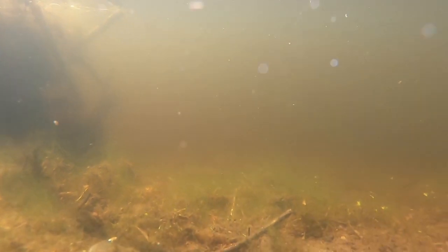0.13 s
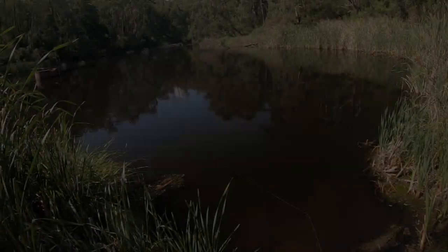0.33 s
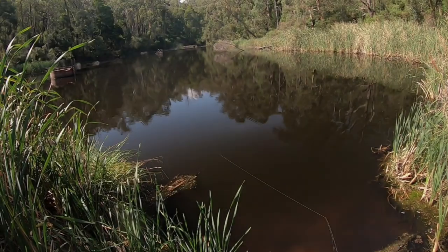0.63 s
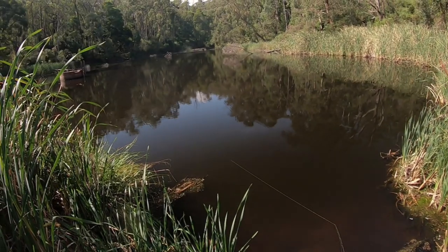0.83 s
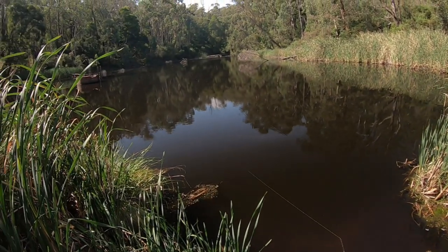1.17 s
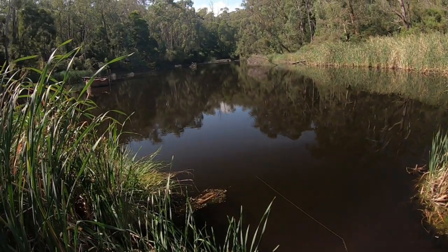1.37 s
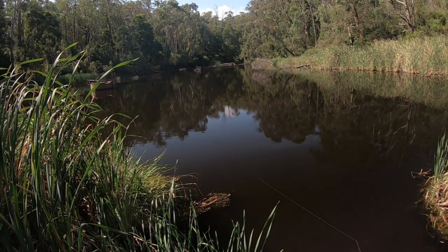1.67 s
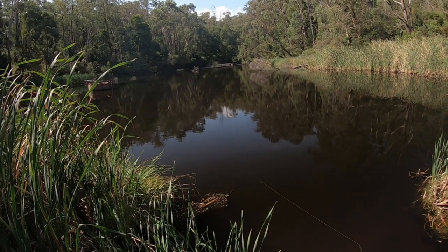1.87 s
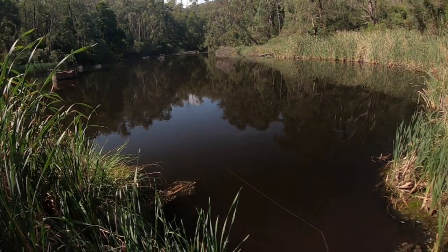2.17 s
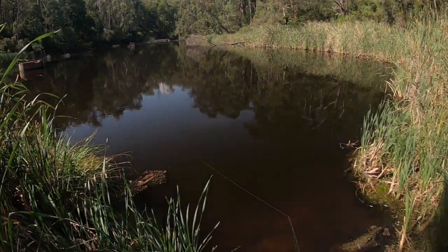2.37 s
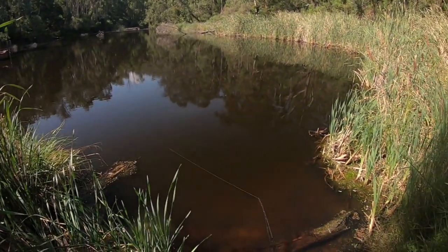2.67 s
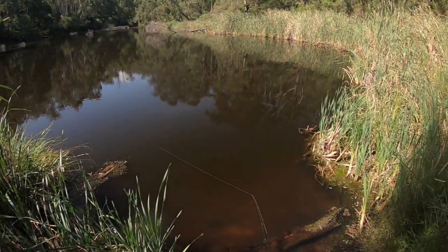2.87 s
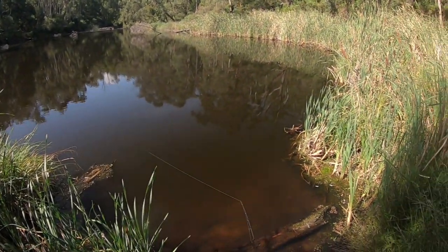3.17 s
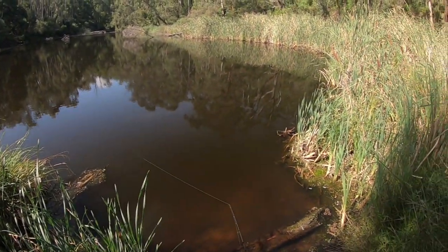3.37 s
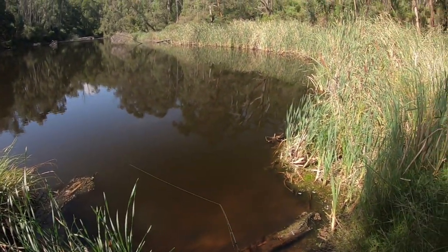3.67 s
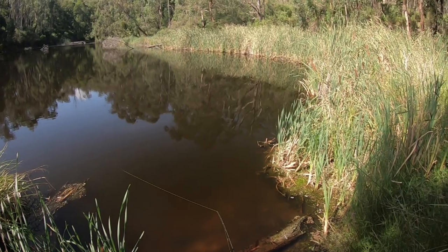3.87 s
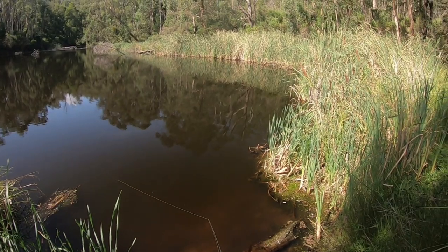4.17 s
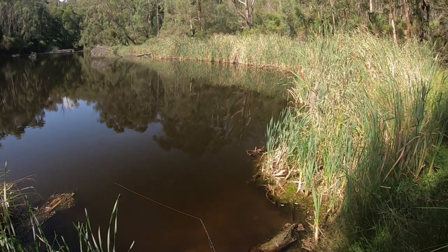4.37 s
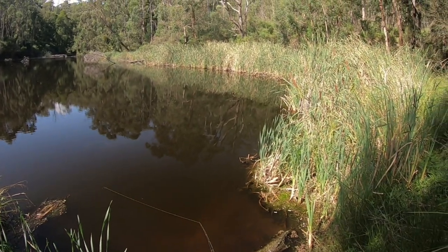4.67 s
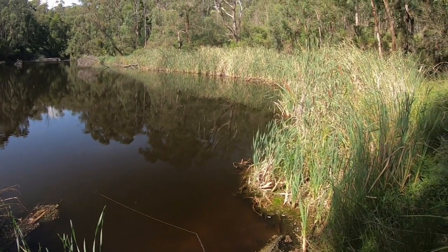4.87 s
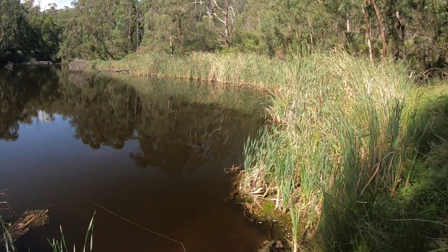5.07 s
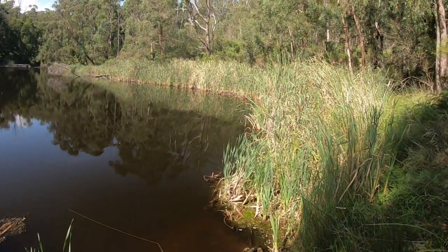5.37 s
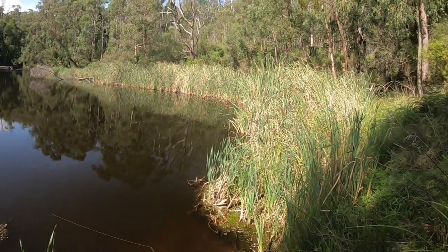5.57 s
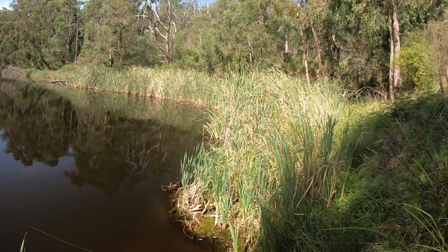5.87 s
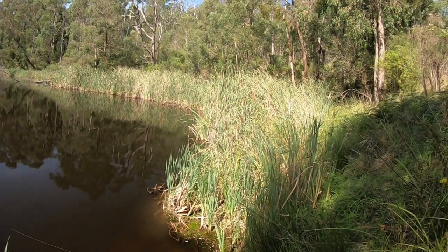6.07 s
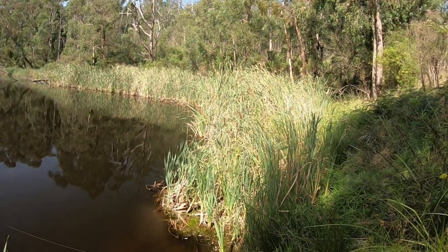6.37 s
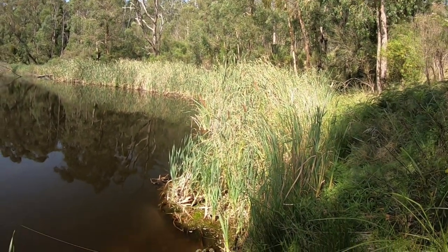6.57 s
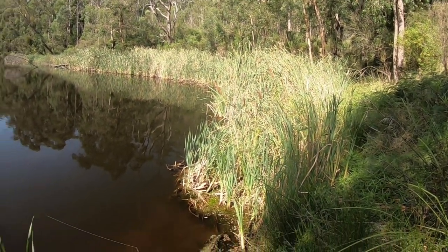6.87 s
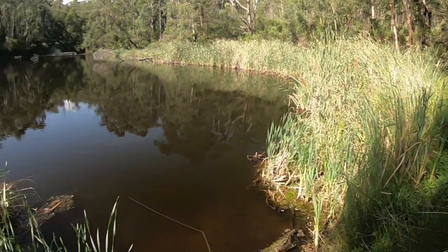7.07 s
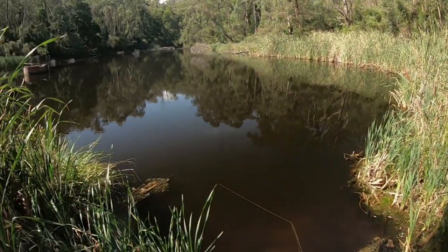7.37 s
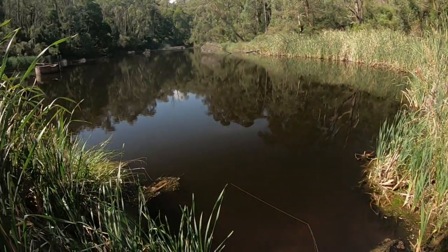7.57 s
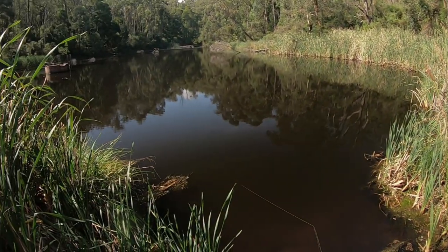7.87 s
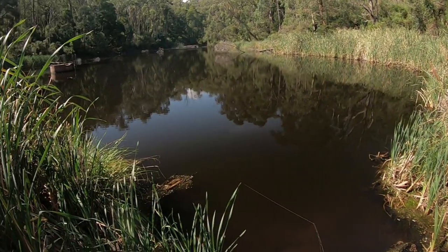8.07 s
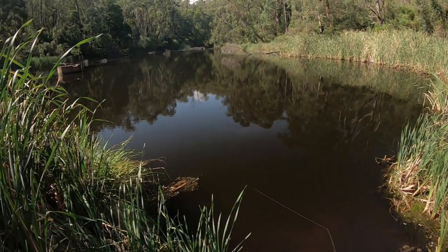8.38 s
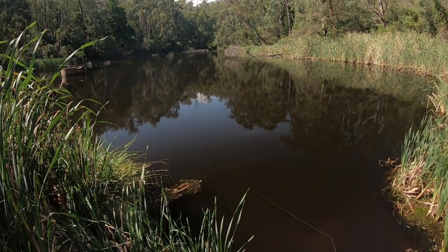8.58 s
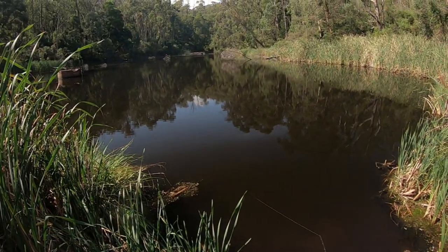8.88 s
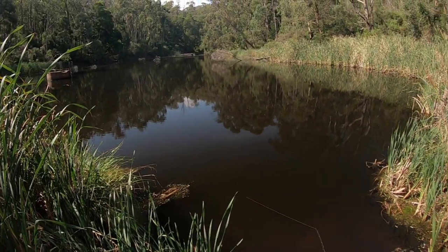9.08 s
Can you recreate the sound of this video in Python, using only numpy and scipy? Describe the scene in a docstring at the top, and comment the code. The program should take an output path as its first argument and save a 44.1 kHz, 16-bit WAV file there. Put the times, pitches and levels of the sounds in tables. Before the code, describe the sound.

For a fifth of a second, low water rumble and dull knocks hit a submerged microphone, then stop with a click. A quiet pond bank fades in over about a second: faint distant air, a shimmering far insect chorus, repeated high trills and pulsing insects in the reeds. A small bird gives several quick chirps early on, with fainter whistles and dry twig ticks. Near the end a raspy insect joins. Stereo, open air.

```python
"""A low rumble and knocks come first: a camera under a pond, where shaped noise shoves its housing, cut dead.
The bank above fades in: quiet distant air of banded noise, a far chorus of throbbing noise and a thin whine.
Insects in the reeds sing trills of falling tones; two near ones pulse at their own rates in arching tones.
Small birds chirp and whistle as gliding tones, near and far; ringing twigs tick a few times.
Late on, another insect joins with a rasp of fast-modulated noise."""
import sys
import numpy as np
from scipy import signal
from scipy.fft import rfft, irfft, next_fast_len
from scipy.io import wavfile
from scipy.ndimage import uniform_filter1d

SR = 44100
rng = np.random.default_rng(int(sys.argv[2]) if len(sys.argv) > 2 else 0)


def transcribe(u):
    """Save the signal u as a 16-bit wav file named by the first command-line argument.

    u: samples, shape (n,) or (channels, n), limited to [-1, 1]; the rate is SR.
    q: integer samples, one column per channel.
    """
    v = np.clip(np.atleast_2d(u).T, -1, 1)
    q = np.round(v * 32767).astype(np.int16)
    wavfile.write(sys.argv[1], SR, q)


N = 406196
T = np.arange(N) / SR  # s
NFFT = next_fast_len(N)
HZ = np.maximum(np.fft.rfftfreq(NFFT, 1 / SR), 1)

# Under the pond, at the camera's housing
# colour of the water moving against the housing: freq_hz, relative density_db (per Hz)
WATER_COLOUR = [(10, -58), (30, -45), (50, -56), (67, -47.5), (100, -59.5), (125, -66), (165, -61.5),
                (280, -81), (450, -95.5), (1200, -105), (3000, -117), (5500, -130), (9000, -150)]
# relative force of the water's shove: time_s, force_db
SHOVE_FORCE = [(0, 11), (.02, 7), (.04, -4.5), (.07, 0), (.1, 0.5), (.2, -1)]
# brief scuffs on the housing: centre_s, peak level_db, half_length_s
HOUSING_SCUFFS = [(.0155, -69, .0025), (.027, -79, .005), (.08, -80, .002), (.189, -78, .006)]
# knocks on the housing, before its wall dulls them: start_s, peak_db, time_to_peak_s
HOUSING_KNOCKS = [(0.0161, -23, 0.0014), (.0602, -44.5, 0.00051), (0.0786, -28, 0.00078),
                  (0.097, -44, 0.00069), (0.129, -58, .0006)]
# ring of the housing: pitch_hz, level_db against the knock's own scale, decay_s
HOUSING_RING = [(620, -10, 0.00087), (1060, -19.5, 0.00068), (1530, -31, 0.0019)]
WATER_DB = -30.7  # rms up to the cut, before scuffs and knocks
CUT_S = 0.2198

# On the bank, open air and far insects
FADE_S, FADE_POWER = 0.97, 1.01  # fade-in length after the cut, power of its ramp
# colour of the distant air, relative densities per Hz: freq_hz, common_to_both_sides_db, opposed_sides_db
AIR_COLOUR = [(30.1, -97.5, -99), (119.3, -99.2, -101.9), (153.4, -84.5, -84.5), (207, -84, -87),
              (265, -90.5, -91.8), (405, -95, -93.5), (564, -101, -95.5), (743, -91.5, -84),
              (1027, -97.5, -92), (1277, -97, -92.5), (2014, -104.1, -103), (3570, -104.5, -109.5),
              (6220, -109.6, -109.9), (8900, -111, -112), (9680, -124, -126)]
# gusts in the low rumble: centre_s, half_length_s, centre_hz, lift_db
RUMBLE_GUSTS = [(1.063, 0.039, 170, 4), (1.29, 0.072, 200, 5.5), (1.6, .2, 169, 3.5), (1.97, .05, 201, 9),
                (2.14, 0.045, 171, 3), (2.24, 0.074, 380, 7.5), (2.633, 0.051, 170, 6),
                (3.17, 0.05, 170, 5.5), (3.668, .07, 170, 3.5), (4.33, 0.098, 172, 4.5), (7.1, .17, 170, 2),
                (7.98, 0.064, 350, 4), (8.308, 0.098, 170, 4), (9.05, 0.067, 170, 1.5)]
AIR_SWELL_DB = .35  # spread of the wind's slow swell
# colour of the massed insects: freq_hz, relative density_db (per Hz)
CHORUS_COLOUR = [(5900, -125), (6600, -109), (7200, -106), (7500, -104), (8000, -99.5), (8550, -94.5),
                 (8950, -102.5), (9200, -107), (9600, -118), (10500, -130)]
# strength of the massed insects: time_s, relative level_db
CHORUS_SWELL = [(1.2, 2), (4.8, -0.3), (5.4, -1), (7.7, 0.3), (8.3, 1.5), (9.2, 1)]
WHINE_HZ, WHINE_DB = 7736, -84  # centre pitch, peak level before panning

# In the reeds and trees
# trills: first_note_s, last_note_s, period_s, top_pitch_hz, level_db, growth_by_last_note_db,
# fade_along_each_note_db, left_minus_right_db, reed_scatter_db (against the straight sound)
TRILL_RUNS = [(0.325, 0.618, .059, 8080, -61.5, -0.5, -3, 2, 5),
              (0.992, 1.551, .062, 7350, -67.5, 0, -1, 17, 2),
              (2.281, 2.842, .0623, 7220, -62.5, 4, 4, 2, 7),
              (3.393, 3.954, .062, 7260, -61.5, 1.5, 2, -10, 4),
              (4.319, 4.811, .0616, 7340, -63, 1, 5, -5, -4),
              (5.181, 5.735, .0616, 7300, -59.5, 0.5, 4, -3, -6),
              (6.103, 6.656, .0616, 7360, -56.5, -1.5, 0, -8, -17),
              (7.082, 7.698, .0616, 7380, -59.5, -9, -5, 2, 0),
              (7.31, 7.56, .0643, 6760, -70, 3, -14, -14, 2),
              (7.882, 8.137, .0647, 6700, -68.5, 1, -19, -18, 2),
              (8.392, 8.904, .0645, 6850, -65.5, -4, -11, -15, 0),
              (9.16, 9.29, .0645, 7100, -61, 0, -14, -15, -4.5),
              (8.057, 8.613, .0617, 7350, -69, 0, -7, 21, 2), (8.92, 9.494, .0634, 7440, -66, 0, -4, 10, 2)]
# shape of one trill note: time_s, pitch as share of the top pitch, relative amplitude
TRILL_NOTE = [(0, .94, 0), (.0015, .975, .85), (.005, 1, 1), (.009, .975, .9), (.013, .91, .65),
              (.0165, .85, .3), (.019, .83, 0)]
# faint single glides of other birds: start_s, length_s, start_hz, end_hz, relative level_db,
# left_minus_right_db
BIRD_WHISTLES = [(0.866, .13, 1950, 2250, -74, 9), (1.645, 0.038, 5600, 4500, -71, 2),
                 (3.335, 0.018, 3980, 3450, -70, 1), (3.35, .022, 3490, 4770, -69, 4),
                 (3.367, 0.17, 4740, 5680, -73, 11), (3.58, 0.22, 2045, 2005, -74.5, 13),
                 (4.046, 0.024, 3880, 3400, -67, 0), (6.679, 0.038, 5200, 5540, -77, 4),
                 (6.993, 0.025, 5700, 5620, -75, -1), (7.51, 0.019, 4740, 4530, -70, 0),
                 (7.88, 0.18, 4450, 5100, -81, 3), (8.046, .135, 5080, 5720, -74, 8),
                 (8.07, .021, 3930, 3630, -71, -3), (8.83, .06, 5100, 5750, -74, 10)]
# chirps of a near bird, one list of points each: time_s, pitch_hz, level_db (before panning)
BIRD_CHIRPS = [
    [(1.89, 3280, -72), (1.905, 3310, -63), (1.925, 3050, -70), (1.95, 2250, -77), (1.975, 2000, -86),
     (1.997, 2780, -68), (2.009, 3450, -62), (2.018, 4400, -80)],
    [(2.27, 4060, -79), (2.3, 4020, -71), (2.33, 4036, -65), (2.352, 3990, -66), (2.372, 3540, -59.5),
     (2.4, 3060, -60), (2.422, 2750, -61), (2.436, 2405, -62), (2.447, 2250, -70), (2.461, 2560, -55),
     (2.466, 2750, -66), (2.48, 3130, -66)],
    [(2.685, 3630, -62), (2.699, 3800, -65), (2.714, 3150, -57), (2.728, 2495, -60), (2.742, 1936, -73),
     (2.757, 2575, -53.5), (2.772, 2790, -58.5), (2.79, 3320, -52.5), (2.798, 3950, -67), (2.81, 5260, -72)],
    [(2.968, 4780, -79), (2.98, 3840, -61), (2.988, 2940, -59), (2.997, 2370, -70), (3.008, 2007, -66),
     (3.021, 2840, -63), (3.029, 3420, -52.5), (3.036, 3490, -60), (3.048, 3020, -64)],
]
CHIRP_PAN_DB = -3  # left minus right
# twig ticks: start_s, nominal level_db, ring_hz, upper_ring_hz, upper_ring_db, decay_s,
# rebound_after_s, rebound amplitude as share, echo_db (against the tick)
TWIG_TICKS = [(1.986, -55, 6050, 3300, -8, .001, .003, .7, -4),
              (3.235, -54, 5700, 3640, -1, .001, .002, .7, -6),
              (3.2879, -45, 1200, 3610, -5, 0.0029, .0031, 0.79, -4),
              (3.3003, -46.5, 3800, 4100, -4, 0.0011, .012, .5, 3),
              (3.9543, -37, 3550, 4200, -2.5, 0.0011, 0.0032, 0.58, -7)]
# runs of pulses: first_pulse_s, last_pulse_s, period_s, pitch_hz, settled level_db,
# first_pulse_against_settled_db, left_minus_right_db, reed_scatter_db (against the straight sound)
PULSE_RUNS = [(2.461, 3.769, .093, 8960, -68, -6, 14, -4), (3.864, 5.074, .0928, 9060, -61.5, -1.5, -4, -5),
              (3.479, 5.118, .078, 8830, -67, -11.5, -20, -1),
              (5.355, 5.898, .0783, 8720, -63.5, -11, -23, -5),
              (5.905, 7.017, .0928, 9070, -62, -8, -11, 7), (6.296, 7.08, .0784, 8680, -69.5, 2, -25, 3),
              (7.156, 7.868, .0787, 8830, -68, -3, -7, -4),
              (7.939, 9.141, .0923, 9100, -57, -6.5, -23, 4.5)]
PULSE_SETTLE_S = 0.41  # time constant towards a run's steady level
# colour of the rasping insect: freq_hz, density_db (per Hz, before its strokes and panning)
RASP_COLOUR = [(6000, -150), (7050, -112), (7350, -99.5), (8100, -99), (8600, -104), (9500, -140)]
BUZZ_S = 8.96  # its entry

TOP_HZ = 10400  # edge of the camera's treble cut


def amp(db):
    """Decibels to gain."""
    return 10 ** (np.asarray(db) / 20)


def pan(x, db):
    """Place a sound by its left minus right level."""
    return x * amp(np.array([[db], [-db]]) / 2)


def add(out, s, x):
    """Mix a short sound into a track at time s."""
    i = int(np.clip(s * SR, 0, N))
    out[..., i:i + x.shape[-1]] += x[..., :N - i]


def noise(hz, db):
    """Noise with a given density in dB per Hz."""
    gain = amp(np.interp(np.log(HZ), np.log(hz), db)) * np.sqrt(SR / 2)
    return irfft(rfft(rng.standard_normal(NFFT)) * gain, NFFT)[:N]


def walk(rate):
    """Straight lines between chance values, rate per second; the last of 1000 is held."""
    knots = rng.standard_normal(1000)
    return np.interp(T * rate, np.arange(len(knots)), knots)


def scatter(x, t60, delay):
    """Many weak reflections off leaves and stems, different at each ear, with unit energy."""
    t = T[:SR]
    build = np.clip(t / delay, 0, 1) ** 2
    tail = rng.standard_normal((2, SR)) * np.exp(-np.log(1000) * t / t60) * build
    tail /= np.sqrt(np.sum(tail ** 2, axis=1, keepdims=True))
    return signal.oaconvolve(x[None], tail[:, t < 2 * t60], axes=1)[:, :N]


def in_reeds(x, pan_db, scatter_db, far_db=-13):
    """An insect's sound comes partly straight, partly off the nearest stems, and faintly from reeds beyond."""
    stems = scatter(x, t60=0.018, delay=0.0006)
    reeds = stems + amp(far_db) * scatter(x, t60=0.16, delay=0.0051)
    return (pan(x, pan_db) + amp(scatter_db) * reeds) / np.hypot(1, amp(scatter_db))


def beats(first, last, period):
    """Evenly spaced times from first to last, about one period apart."""
    return np.linspace(first, last, round((last - first) / period) + 1)


def arch(length, peak, power):
    """Progress 0-1 through one bird syllable, and its strength, which swells to a peak and dies away."""
    u = np.linspace(0, 1, int(length * SR))
    warped = np.interp(u, [0, np.clip(peak, .1, .9), 1], [0, .5, 1])
    return u, np.abs(np.sin(np.pi * warped)) ** power


def underwater(ease=0.0013, wall_hz=1450, click_db=-35.0, click_s=0.0035):
    """Water shoves the sealed housing, scuffs it and knocks on it; the sound stops dead."""
    water = noise(*np.transpose(WATER_COLOUR))
    # even out the noise before the shove shapes it
    evened = water / np.sqrt(uniform_filter1d(water ** 2, size=SR // 20))
    x = evened * amp(np.interp(T, *np.transpose(SHOVE_FORCE)))
    x = x * amp(WATER_DB) / np.sqrt(np.mean(x[T < CUT_S] ** 2))

    grit = noise([500, 1600, 4200, 5500, 9500], [-10, 0, -4, -14, -20])
    scuffing = sum(amp(db) * np.exp(-((T - s) / length) ** 2) for s, db, length in HOUSING_SCUFFS)
    x = x + grit / grit.std() * scuffing

    t = T[:SR // 20]
    ring = sum(amp(db) * np.exp(-t / decay) * np.sin(2 * np.pi * hz * t) for hz, db, decay in HOUSING_RING)
    wall = signal.butter(4, wall_hz, fs=SR, output="sos")
    for s, db, decay in HOUSING_KNOCKS:
        # the thick wall rounds each knock into a dull push and rings briefly
        push = (t / decay) ** 2 * np.exp(2 - 2 * t / decay)
        add(x, s, amp(db) * signal.sosfilt(wall, push + ring))

    # the cut leaves a click: a sudden step down to silence
    closing = np.exp(np.minimum(T - CUT_S, 0) / click_s)
    x = x * (1 - closing) + amp(click_db) * closing
    return pan(x * np.clip(T / ease, 0, 1) * (T < CUT_S), 0)


def air(flicker_db=1.21):
    """Distant wind in the trees: each octave swells and flickers on its own; gusts lift the low rumble."""
    hz, mid_db, side_db = np.transpose(AIR_COLOUR)
    mid, side = noise(hz, mid_db), noise(hz, side_db)
    spectrum = rfft(np.array([mid + side, mid - side]), NFFT)
    octave = np.clip(np.log2(HZ / 160), 0, 6)
    out = 0
    for k in range(7):
        band = irfft(spectrum * np.maximum(1 - abs(octave - k), 0), NFFT)[:, :N]
        gust_db = 0
        if k < 3:
            for s, length, centre, db in RUMBLE_GUSTS:
                share = max(1 - abs(np.log2(centre / 160) - k), 0)
                gust_db = gust_db + db * share * np.exp(-((T - s) / length) ** 2)
        unrest_db = AIR_SWELL_DB * walk(1.977) + flicker_db * walk(13)
        out = out + band * amp(-1.05 + gust_db + unrest_db)
    return pan(out, -0.37)


def chorus(count=5, throb_db=3.0):
    """Groups of far insects, each noise throbbing at its own wandering rate, blurred by distance."""
    out = 0
    for rate_hz in np.linspace(10.6, 13.4, count):
        phase = np.cumsum(rate_hz * (1 + 0.021 * walk(1.83))) / SR + rng.random()
        throb = amp(throb_db * np.cos(2 * np.pi * phase))
        voices = np.array([noise(*np.transpose(CHORUS_COLOUR)) for _ in range(2)])
        out = out + voices * throb / np.sqrt(np.mean(throb ** 2) * count)
    return pan(out, -2.1) * amp(np.interp(T, *np.transpose(CHORUS_SWELL)))


def whine():
    """A faint, thin tone, more on the right, at steady strength with its pitch wandering a few hertz."""
    phase = 2 * np.pi * np.cumsum(WHINE_HZ + 3 * walk(8)) / SR
    return pan(amp(WHINE_DB) * np.sin(phase), -8)


def far_birds(count=16, level_db=-73, centre_hz=3600):
    """Tiny gliding calls at chance times from across the water, heard only as echo."""
    x = np.zeros(N)
    for when, pitch, slope, length, loud in rng.random((count, 5)):
        u = np.linspace(-1, 1, int(SR * (0.058 + .06 * length)))
        hz = centre_hz * 2 ** (pitch - .5 + 0.26 * (slope - .5) * u)
        call = (1 - u ** 2) * np.sin(2 * np.pi * np.cumsum(hz) / SR)
        add(x, when * N / SR, amp(level_db + 2.7 * loud) * call)
    return scatter(x, t60=0.56, delay=0.011)


def trills(start_drop=0.079, start_db=-2.0, warm_notes=2.1, uneven_db=1.0, clipped_db=-12):
    """Trains of hooked, falling notes that climb in pitch, strength and length over the first few."""
    out = 0
    at, share, size = np.transpose(TRILL_NOTE)
    t = T[:int(at[-1] * SR)]
    glide, shape = np.interp(t, at, share), np.interp(t, at, size)
    for first, last, period, hz, db, growth_db, fade_db, pan_db, scatter_db in TRILL_RUNS:
        x = np.zeros(N)
        for k, s in enumerate(beats(first, last, period)):
            cold = np.exp(-k / warm_notes)  # 1 at the first note, then dying away
            pitch = hz * glide * (1 - start_drop * cold + .004 * rng.standard_normal())
            trend_db = start_db * cold ** 2 + growth_db * (s - first) / (last - first)
            gain = amp(db + trend_db + uneven_db * rng.standard_normal())
            fade = amp((fade_db + clipped_db * cold ** 2) * (t / t[-1]) ** 2)
            add(x, s, gain * shape * fade * np.sin(2 * np.pi * np.cumsum(pitch) / SR))
        out = out + in_reeds(x, pan_db, scatter_db)
    return out


def whistles(peak=0.42, power=0.31, fading_db=3.5, waver=.011):
    """Each whistle is one glide that fades in and out on its way over the water, blurred by the trees."""
    out = np.zeros((2, N))
    fading, unsteady = amp(fading_db * walk(60)), 1 + waver * walk(90)
    for s, length, start_hz, end_hz, db, pan_db in BIRD_WHISTLES:
        u, strength = arch(length, peak, power)
        on = int(s * SR) + np.arange(len(u))
        pitch = start_hz * (end_hz / start_hz) ** u * unsteady[on]
        tone = np.sin(2 * np.pi * np.cumsum(pitch) / SR)
        add(out, s, pan(amp(db) * strength * fading[on] * tone, pan_db))
    return amp(1.5) * out + scatter(out.mean(0), t60=1.0, delay=0.0089)


def near_bird(waver=0.012, flutter_db=2.0, echo_s=0.021, echo_db=-14):
    """Slightly hoarse chirps, mostly swooping down and flicking back up; the bank and trees echo them."""
    voice = np.zeros(N)
    unsteady, flutter = 1 + waver * walk(350), amp(flutter_db * walk(200))
    for chirp in BIRD_CHIRPS:
        s, hz, db = np.transpose(chirp)
        on = (T > s[0]) & (T < s[-1])
        phase = 2 * np.pi * np.cumsum(np.interp(T[on], s, hz) * unsteady[on]) / SR
        edges = signal.windows.tukey(len(phase), .06)
        add(voice, s[0], edges * amp(np.interp(T[on], s, db)) * flutter[on] * np.sin(phase))
    out = pan(voice, CHIRP_PAN_DB)
    add(out, echo_s, pan(amp(echo_db) * voice, 2.7))
    close_echo = amp(-4.5) * scatter(voice, t60=0.14, delay=0.011)
    long_echo = amp(-7.5) * scatter(voice, t60=1.0, delay=0.032)
    return out + close_echo + long_echo


def twigs(crack=0.47):
    """A dry tick cracks, rings two short resonances and rebounds once; the bank returns an echo."""
    x, sent = np.zeros((2, N))
    t = T[:SR // 40]
    for s, db, hz, upper_hz, upper_db, decay, gap, rebound, echo_db in TWIG_TICKS:
        wood = signal.butter(4, [0.86 * hz, min(1.74 * hz, 8000)], "band", fs=SR, output="sos")
        ring = np.sin(2 * np.pi * hz * t) + amp(upper_db) * np.sin(2 * np.pi * upper_hz * t)
        swell = np.exp(-t / decay) - np.exp(-t / 0.00034)  # quick rise, then decay
        for when, size in ((s, 1), (s + gap, rebound)):
            grit = signal.sosfilt(wood, rng.standard_normal(len(t)) * np.exp(-t / decay))
            tick = amp(db) * size * (ring * swell + 2 * crack * grit)
            add(x, when, tick)
            add(sent, when, amp(echo_db) * tick)
    return pan(x, .5) + scatter(sent, t60=0.77, delay=0.0035)


def pulsing_insects(length=0.04, bend=0.18, rough=0.23, scrape_db=-6):
    """Each wing stroke speeds up and slows down, so its tone arches up and back."""
    out = 0
    u = np.linspace(-1, 1, int(length * SR))
    scrape = noise([6800, 7930, 8820, 9450], [-45, -14, 8, -48])
    scrape = scrape / scrape.std()
    for first, last, period, hz, full_db, start_db, pan_db, scatter_db in PULSE_RUNS:
        tone, force = np.zeros((2, N))
        for s in beats(first, last, period):
            settling_db = start_db * np.exp((first - s) / PULSE_SETTLE_S)
            db = full_db + settling_db + 0.36 * rng.standard_normal()
            # the file's teeth catch unevenly
            catch = np.interp(u, np.linspace(-1, 1, 16), rng.standard_normal(16))
            pitch = hz * (1 - bend * u ** 2 + 0.0027 * catch)
            stroke = amp(db) * np.cos(np.pi * u / 2) ** 2 * (1 + rough * catch)
            add(tone, s - length / 2, stroke * np.sin(2 * np.pi * np.cumsum(pitch) / SR))
            add(force, s - length / 2, stroke)
        out = out + in_reeds(tone + amp(scrape_db) * force * scrape, pan_db, scatter_db)
    return out


def buzzing_insect(rate_hz=140, depth=0.41, onset_s=0.057):
    """Another insect joins in with a fast, dry rasp: noise pulsed by strokes of unsteady rate."""
    rasp = np.array([noise(*np.transpose(RASP_COLOUR)) for _ in range(2)])
    phase = 2 * np.pi * np.cumsum(rate_hz * (1 + 0.057 * walk(30))) / SR
    strokes = 1 + depth * np.sin(phase)
    return pan(rasp * strokes * np.clip((T - BUZZ_S) / onset_s, 0, 1), -2)


def scene():
    """The moment under water, then the bank fading in."""
    background = air() + chorus() + whine()
    birds = far_birds() + whistles() + near_bird()
    reeds = trills() + pulsing_insects() + buzzing_insect()
    bank = background + birds + reeds + twigs()
    return underwater() + bank * np.clip((T - CUT_S) / FADE_S, 0, 1) ** FADE_POWER


def record(dry):
    """The camera cuts the top with a steep low-pass."""
    return signal.sosfilt(signal.ellip(8, .2, 70, TOP_HZ, fs=SR, output="sos"), dry)


dry = scene()
out = record(dry)
transcribe(out)
```